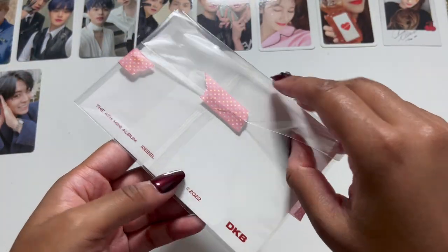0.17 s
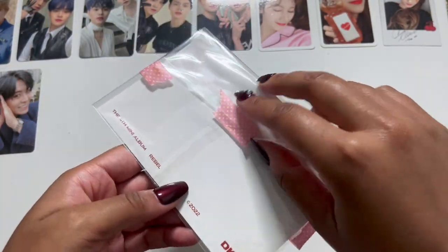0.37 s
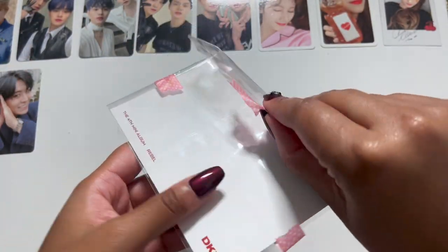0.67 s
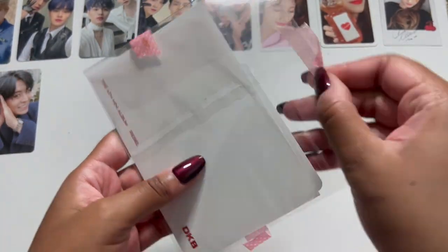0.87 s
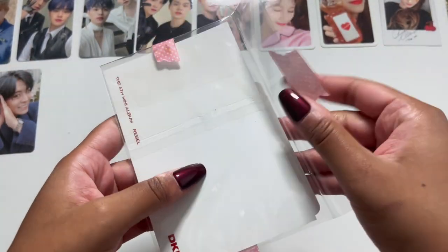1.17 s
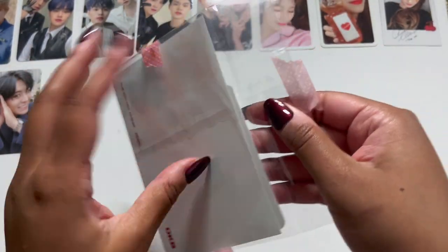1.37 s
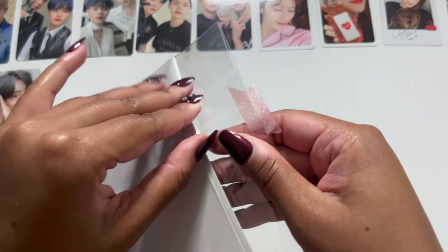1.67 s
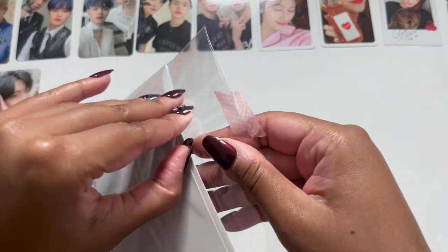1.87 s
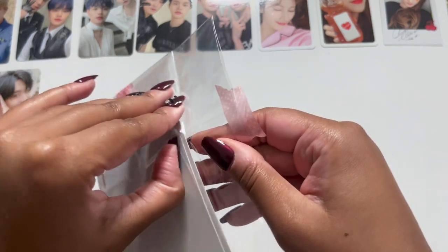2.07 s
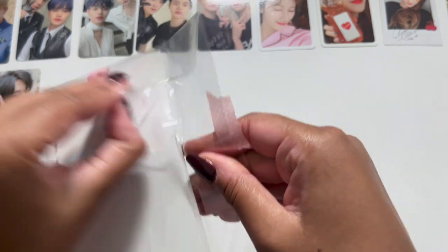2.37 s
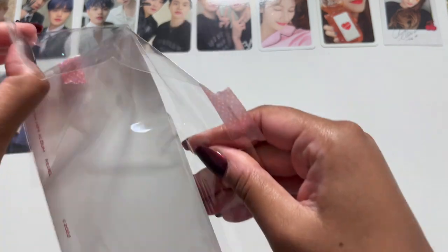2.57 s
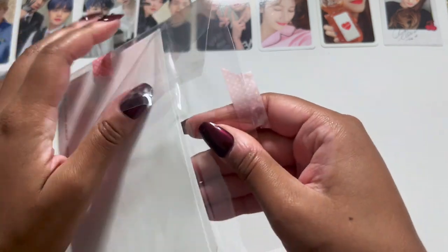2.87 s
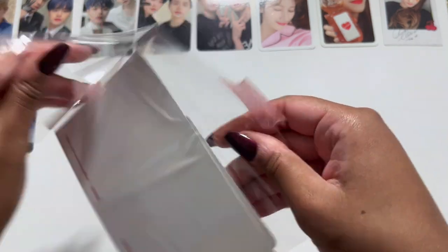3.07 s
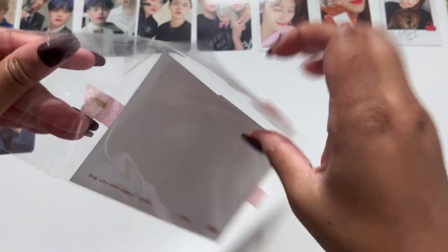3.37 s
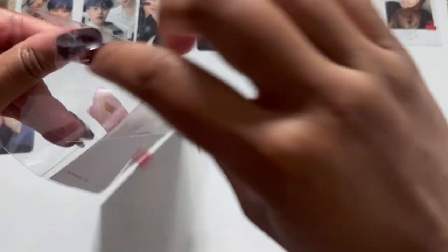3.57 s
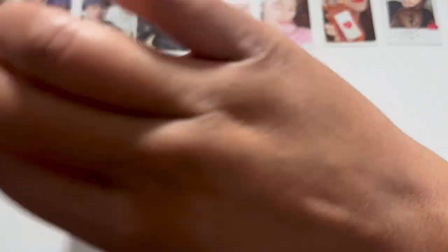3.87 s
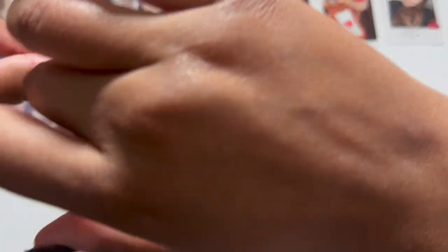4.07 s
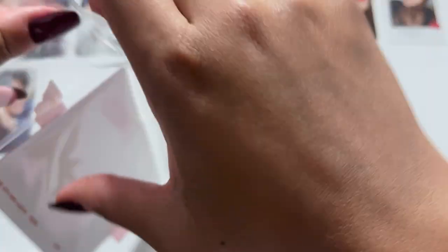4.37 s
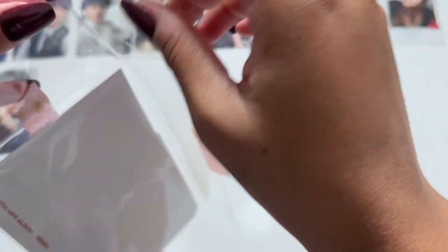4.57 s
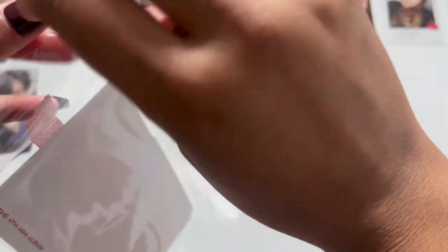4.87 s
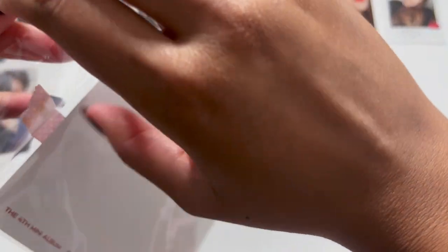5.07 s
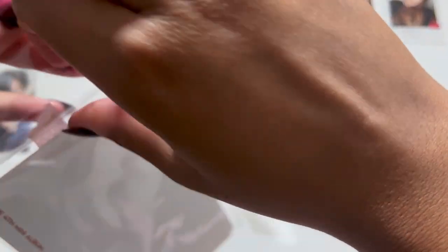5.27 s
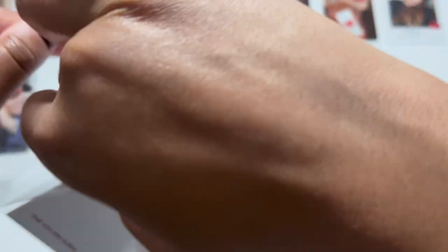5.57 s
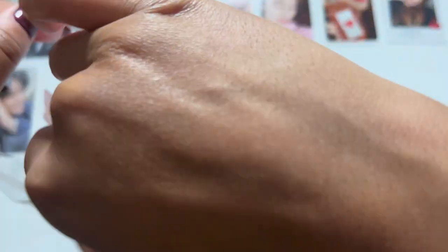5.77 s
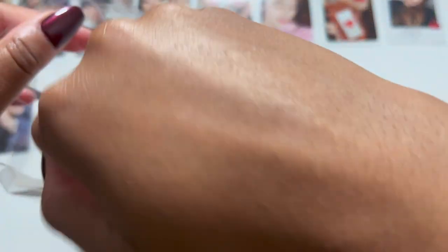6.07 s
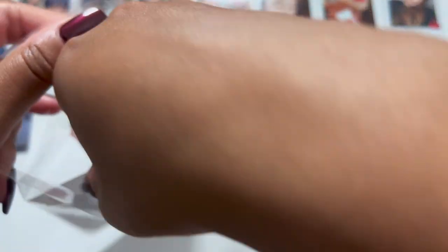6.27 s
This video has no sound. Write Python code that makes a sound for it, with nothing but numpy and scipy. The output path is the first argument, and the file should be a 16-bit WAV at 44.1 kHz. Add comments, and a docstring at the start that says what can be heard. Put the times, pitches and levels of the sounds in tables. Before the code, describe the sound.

Crisp film buckles irregularly, bright and dry with short hollow pops, nearer the left side. It begins quietly, grows steadily, peaks in a sharp crackling burst, continues in separate snaps with brief lulls, and thickens again near the end. Soft knocks on the table top and deep short bumps travel through the microphone stand. Close stereo pickup in a small room with short reflections and very faint hiss.

```python
"""Bright ticks, bursts of film noise and hollow pops over fine crackle: two hands open a thin plastic sleeve
over a table, close under a small stereo recorder on a stand. Each buckling crease is a tick plus short noises
with decaying sine rings. Wrists give low decaying sines, knocks a sum of table modes; shaped noise makes
the stand's tremble and the hiss. A small room answers the film through decaying noise tails."""
import sys
import numpy as np
from scipy import signal
from scipy.fft import rfft, irfft, next_fast_len
from scipy.io import wavfile

SR = 44100
rng = np.random.default_rng(int(sys.argv[2]) if len(sys.argv) > 2 else 0)


def generate_wav(signal):
    """Clip the signal to [-1, 1] and save it as 16-bit WAV at the path in sys.argv[1]."""
    frames = np.transpose(np.atleast_2d(signal))
    scaled = np.clip(frames, -1, 1) * 32767
    pcm = np.round(scaled).astype(np.int16)
    wavfile.write(sys.argv[1], SR, pcm)


N = 283122


def amp(db):
    """Amplitude factor of a level in dB."""
    return 10 ** (np.asarray(db) / 20)


def unit(x):
    """x scaled to RMS 1 over all its channels."""
    return x / np.sqrt(np.mean(x ** 2) + 1e-20)


def along(points, hz):
    """(Hz, value) points interpolated on a log frequency axis."""
    f, v = np.transpose(points)
    return np.interp(np.log(hz + 1), np.log(f + 1), v)


def curves(rows, at_s):
    """Each column after the time, read at the given seconds."""
    time_s, *columns = np.transpose(rows)
    return [np.interp(at_s, time_s, column) for column in columns]


def filtered(x, response):
    """x times a zero-phase response of frequency."""
    m = next_fast_len(N + SR // 2)
    spectrum = rfft(x, m) * response(np.fft.rfftfreq(m, 1 / SR))
    return irfft(spectrum, m)[..., :N]


def snaps():
    """Single creases that stand out as they buckle."""
    # Each row: start in seconds, burst energy in dB, burst pitch in Hz, pop energy in dB, pop pitch in Hz,
    # tick energy in dB; energies before colouring.
    snap_rows = [(0.1867, -39, 6220, -41, 300, -39), (0.2187, -29, 4400, -39, 300, -40),
                 (0.2364, -18, 4130, -25.5, 1670, -27), (0.2966, -35, 1710, -48, 1590, -22),
                 (0.307, -17, 5140, -41, 830, -17), (0.3462, -20, 5090, -33, 870, -33),
                 (0.471, -21, 5100, -31, 830, -6), (0.4773, -23, 7100, -41, 930, -6),
                 (0.4804, -20, 4200, -25, 835, 1.5), (0.4942, -19, 5370, -23.5, 930, -29),
                 (0.5015, -15, 4400, -28, 900, -12), (0.547, -24, 5500, -43, 596, -21),
                 (0.6034, -39, 5020, -50, 1000, -31), (0.663, -32, 2130, -32, 390, -58),
                 (0.6796, -4, 4750, -7.5, 1556, -1.5), (0.7232, -9.5, 3370, -16, 590, -13),
                 (0.851, -24, 3180, -26, 680, -17), (0.8571, -27, 2440, -30, 300, -31),
                 (0.9267, -31, 2470, -23, 850, -50), (1.072, -30, 3270, -29, 875, -50),
                 (1.092, -41, 1920, -20, 480, -34), (1.1278, -29, 4760, -19, 440, -28),
                 (1.1895, -24.5, 6430, -23.5, 546, -19.5), (1.218, -23, 4700, -24.5, 387, -39),
                 (1.226, -27, 2060, -19, 674, -42), (1.2834, -30, 1990, -30, 840, -29),
                 (1.297, -15, 2210, -16.5, 867, -8.5), (1.359, -29, 1960, -39, 810, -30),
                 (1.472, -27, 3300, -24, 900, -28), (1.494, -14, 3250, -22.5, 1170, -38),
                 (1.5178, -16, 4270, -19.5, 820, -16), (1.533, -9.5, 5940, -16.5, 508, -11.5),
                 (1.5764, -19, 4100, -23.5, 810, -6), (1.6118, -30, 5610, -26, 800, -47),
                 (1.6885, -6.5, 4160, -13, 910, 1), (1.7055, -8, 2040, -17.5, 960, -29),
                 (1.7529, -14.5, 3260, -18.5, 885, -17), (1.7924, -9, 4120, -27, 780, -11),
                 (1.823, -19, 3480, -26, 1170, -18), (1.912, -14, 4050, -30, 1600, -13.5),
                 (1.9314, -19, 4040, -30.5, 910, -15), (1.9598, -14.5, 4230, -23, 880, -4),
                 (2.1735, -18.5, 4090, -25.5, 800, -36), (2.1882, -20.5, 3880, -24.5, 690, -13.5),
                 (2.1942, -24, 5000, -26, 1000, -30), (2.217, -10, 2260, -11, 684, -6),
                 (2.2277, -19, 5460, -25, 870, -2.5), (2.239, -11, 4050, -27, 530, -14),
                 (2.2553, -12, 4750, -23, 770, -18), (2.269, -8.5, 4200, -24, 1030, -17),
                 (2.2735, -6.5, 5480, -18.5, 1660, -9), (2.2795, -11, 5200, -34, 1460, -7.5),
                 (2.3297, -2.5, 3750, -7, 900, 5), (2.3486, -3, 4810, -17, 900, -7),
                 (2.363, 2.5, 3980, -6, 1530, 3), (2.3764, 2.5, 3740, -10, 1490, -4),
                 (2.382, 5.5, 4150, -23, 690, 0), (2.397, 3, 3250, -31, 1060, -3),
                 (2.4027, -10, 3200, -13, 800, -21), (2.4128, -5, 3180, -14, 1000, -15),
                 (2.4667, 4.5, 5760, -5.5, 1500, -24), (2.5798, -13, 5940, -36, 1450, -11.5),
                 (2.605, -6, 5800, -15.5, 665, -6.5), (2.648, -25, 4730, -21, 464, -31),
                 (2.6894, -4, 3630, -4.5, 900, -22), (2.7114, -2, 3980, -11.5, 790, 2),
                 (2.7203, -16, 1700, -8.5, 730, -32), (2.7382, -10.5, 4500, -11, 970, -31),
                 (2.756, -11, 3970, -14, 900, -9), (2.7767, -11, 5650, -14, 810, -1.5),
                 (2.8065, -20, 4040, -29, 1130, -29), (2.8146, -21, 4000, -18, 310, -37),
                 (2.9284, -24.5, 3900, -36, 302, -23), (2.953, -7.5, 5090, -21.5, 900, -6),
                 (2.9929, -4, 1700, -7.5, 720, -5), (3.012, -23, 3650, -14, 780, -30),
                 (3.02, -15, 3210, -14, 900, -35), (3.04, -1.5, 6800, -17, 835, 0.5),
                 (3.046, 2.5, 3320, -5.5, 1070, -11), (3.063, 0, 3360, -8.5, 900, -6),
                 (3.0733, -18, 1960, -12, 293, -26), (3.097, -5, 3300, -17, 810, -7),
                 (3.1114, 3, 4740, -3, 984, 3), (3.1515, -22, 1620, -15, 1090, -16),
                 (3.1588, -6.5, 3250, -10.5, 900, -12), (3.1831, -11.5, 3980, -29, 1000, -13),
                 (3.1917, -10.5, 4230, -20, 980, -13), (3.2444, -18, 3320, -13.5, 790, -16),
                 (3.27, -11, 4170, -15, 1110, -14), (3.2844, -13.5, 3160, -26, 1040, -24),
                 (3.298, -18.5, 2500, -12, 830, -20), (3.3486, -14.5, 4550, -16.5, 845, -23),
                 (3.3961, -16.5, 3320, -19.5, 790, -31), (3.489, -30, 4500, -30, 496, -27),
                 (3.5156, -3.5, 5350, -18.5, 900, -4), (3.5576, -11, 4290, -22.5, 303, -15),
                 (3.6878, -22, 3900, -51, 300, -27), (3.7076, -3.5, 5300, -8.5, 400, -5),
                 (3.8122, -14.5, 2580, -19, 940, -38), (3.8292, -12, 4000, -20.5, 850, -28),
                 (3.9541, -7, 3180, -12.5, 815, -13), (4.0019, -29, 3450, -22, 810, -45),
                 (4.0477, -14, 3520, -23, 880, -31), (4.0882, -22, 4500, -52, 1280, -39),
                 (4.0968, -21, 4820, -13.5, 510, -27), (4.1486, 2, 3000, -3.5, 920, 0),
                 (4.2144, -7.5, 4780, -37, 845, -28), (4.2383, -19, 4500, -23, 795, -40),
                 (4.277, -12, 5400, -20, 806, -36), (4.408, -1, 3840, -8, 843, -1),
                 (4.5582, -28, 5200, -23, 375, -35), (4.5764, -18.5, 3880, -18, 860, -21),
                 (4.6437, -9, 3070, -17, 770, -9.5), (4.6523, -10, 5050, -17.5, 870, -16),
                 (4.679, -12, 4930, -16.5, 302, -24), (4.7163, -19.5, 3120, -25, 835, -35),
                 (4.7465, -15, 3200, -45, 890, -16), (4.773, -21, 4180, -28, 820, -24),
                 (4.793, -24, 2220, -36, 620, -38), (4.8367, -27, 2260, -27, 815, -31),
                 (4.8645, -22, 2320, -35, 730, -38), (4.8798, -3.5, 5370, -23, 860, -7),
                 (4.8917, -3, 3180, -8, 890, -0.5), (4.9281, -14, 4460, -35, 810, -16),
                 (5.0516, -44, 5260, -24.5, 490, -45), (5.126, -27, 4230, -24.5, 800, -41),
                 (5.1513, -10.5, 4260, -18, 304, -28), (5.1807, 1, 4560, -10.5, 774, 0.5),
                 (5.238, -17.5, 3070, -20, 300, -28), (5.2743, -31, 1630, -24, 825, -36),
                 (5.2858, -35, 3850, -17, 770, -46), (5.3166, -8, 7170, -22, 520, -16),
                 (5.378, -27, 3830, -22.5, 400, -20), (5.3912, -30, 1610, -19.5, 890, -37),
                 (5.4018, -17, 4460, -25, 516, -18), (5.421, -16, 2520, -12.5, 900, -11),
                 (5.4308, -21, 1610, -18, 1120, -23), (5.4417, 3, 4450, -8.5, 1480, -1),
                 (5.4674, -1.5, 4300, -12.5, 1350, -8), (5.501, -15, 5660, -25, 1290, -21),
                 (5.521, -12, 4520, -22, 755, -13), (5.525, -5.5, 5100, -12, 850, -10),
                 (5.563, -13, 2600, -19.5, 700, -10), (5.579, -17, 4070, -31, 1520, -37),
                 (5.6171, -4, 3200, -10.5, 826, -4), (5.643, -5.5, 3980, -12, 735, -22),
                 (5.683, -5, 3500, -6, 1510, -5), (5.6932, -2, 4570, -16, 1300, -15),
                 (5.7111, -5, 6280, -15, 980, -5), (5.7245, -2.5, 5260, -33, 300, -3),
                 (5.7342, -8, 2680, -11, 960, -0.5), (5.7451, -3, 5440, -13.5, 840, -22),
                 (5.7895, -18, 5400, -22, 920, -24), (5.8266, -26, 4870, -30, 840, -39),
                 (5.8736, -7.5, 3820, -9.5, 765, -7), (5.9214, -15.5, 4300, -36, 650, -6),
                 (5.9969, -26, 1830, -18, 835, -21), (6.0067, -4.5, 4750, -8, 370, -10),
                 (6.0518, -13.5, 4700, -18, 410, -23), (6.088, -15.5, 2600, -17, 910, -17),
                 (6.1433, -15, 5470, -12.5, 1480, -25), (6.1612, -6.5, 5270, -17.5, 1420, -12),
                 (6.2458, -17, 3100, -18.5, 830, -10), (6.2547, -15, 4350, -19, 300, -32.5),
                 (6.2698, -11.5, 7300, -16.5, 390, -16), (6.2957, -14, 5330, -20.5, 300, -7),
                 (6.3073, -8.5, 3220, -15, 300, -12), (6.3237, -14, 4150, -19, 300, -24),
                 (6.3487, -7, 5880, -19, 302, -9.5), (6.3802, -13, 1940, -14.5, 300, -17)]
    return creases(*np.transpose(snap_rows))


def rustles(count=28):
    """Dense runs of small creases too close to tell apart."""
    # The first run, at 0, stands for the fading room tail of an earlier snap.
    # Each row: start in seconds, length in seconds, burst level in dB, burst pitch in Hz, pop level in dB,
    # pop pitch in Hz, tick level in dB; levels and burst pitch before scatter.
    dense_runs = [(0, 0.037, -49.5, 5630, -67.5, 940, -66), (.33, 0.017, -52, 5250, -67, 844, -48),
                  (2.385, 0.023, -26.5, 3050, -41.5, 930, -30), (2.418, 0.02, -21.5, 4230, -29, 870, -17),
                  (2.444, .019, -35, 3850, -32, 450, -46), (3.055, .014, -28.5, 3280, -33.5, 980, -42),
                  (3.095, 0.058, -53, 3200, -47, 990, -56), (3.2, 0.12, -53, 3320, -45, 1070, -76),
                  (4.92, .012, -44, 4420, -39, 860, -44), (5.148, .008, -33, 4500, -37.5, 420, -43),
                  (5.417, .013, -36, 3140, -40, 890, -40), (5.455, 0.0091, -43, 4370, -34.5, 1330, -56),
                  (5.625, 0.028, -37, 4200, -38, 474, -34.5), (5.713, 0.011, -34, 5170, -35, 910, -39)]
    s, length_s, burst_db, burst_hz, pop_db, pop_hz, tick_db = np.repeat(dense_runs, count, axis=0).T
    place = rng.uniform(size=len(s))
    share_db = 10 * np.log10(length_s * SR / count) + rng.normal(-1.5, 3.5, len(s))
    burst_hz = burst_hz * np.exp(rng.normal(0, 0.15, len(s)))  # scattered from crease to crease
    return creases(s + place * length_s, burst_db + share_db, burst_hz,
                   pop_db + share_db, pop_hz, tick_db + share_db)


def crackle(count=6000):
    """Bending film: many tiny creases at random moments and pitches, some stronger than the rest."""
    # Each row: time in seconds, level of the fine crackle in dB, level of its pops in dB; before colouring.
    bend = [(0, -63, -83), (.13, -69.5, -75.5), (.32, -54.5, -66.5), (.43, -70.5, -72), (.56, -58, -67),
            (.66, -67, -68), (.72, -58, -61), (.9, -62.5, -67.5), (1.03, -68, -68.5), (1.3, -59.5, -59),
            (1.42, -75, -72), (1.56, -64, -62), (1.68, -65, -69), (1.84, -60, -63), (2.02, -65.5, -71),
            (2.2, -79, -67), (2.34, -40.5, -52), (2.4, -26, -45), (2.61, -52.5, -64), (2.77, -51, -74),
            (2.95, -62, -62), (3.16, -47.5, -56), (3.34, -61, -62), (3.54, -57, -59.5), (3.85, -61.5, -64),
            (4.1, -53.5, -52.5), (4.2, -47, -49.5), (4.38, -67, -67), (4.45, -57, -57), (4.8, -62, -62),
            (5.13, -64.5, -62.5), (5.33, -55, -60), (5.56, -57, -55), (5.66, -36.5, -47.5),
            (5.85, -52.5, -55.5), (6.2, -54, -55.5), (6.42, -42, -46.5)]
    gentle_db, tick_at_gentle_db, tick_growth = -55, -58, 0.85  # ticks grow more slowly than the crackle
    pop_median_hz, pop_scatter = 900, 0.18  # hollow of the sleeve; natural-log spread
    burst_median_hz, burst_scatter = 4200, 0.348

    s = rng.uniform(0, N / SR, count)
    spread_db = 2.2 * rng.exponential(size=count) + rng.normal(0, 2.5, (3, count))
    spread_db -= 10 * np.log10(np.mean(amp(spread_db) ** 2) * count / N)  # independent of count
    burst_db, pop_db = curves(bend, s)
    tick_db = tick_at_gentle_db + tick_growth * (burst_db - gentle_db)
    pop_hz = pop_median_hz * np.exp(rng.normal(0, pop_scatter, count))
    burst_hz = burst_median_hz * np.exp(rng.normal(0, burst_scatter, count))
    return creases(s, burst_db + spread_db[0], burst_hz,
                   pop_db + spread_db[1], pop_hz, tick_db + spread_db[2])


def creases(s, burst_db, burst_hz, pop_db, pop_hz, tick_db):
    """Buckling film: a sharp tick, slightly later at the left port; burst and pop last a few milliseconds."""
    # The hands drift left. Each row: time in seconds, lead of the left port in samples.
    left_lead = [(0, 4), (1.6, 4), (2.5, 10), (3.5, 13), (6.42, 12)]
    # The hollow rings most while the sleeve is held wide open.
    # Each row: time in seconds, ring over noise as an amplitude ratio.
    hollow = [(0, 0.6), (2.85, 0.49), (3.05, 1.13), (3.35, 1.2), (3.5, 0.52), (6.42, 0.45)]
    lead = curves(left_lead, s)[0]
    pop_ring = curves(hollow, s)[0][:, None]
    pop = bursts(s, pop_db, life_s=0.0034, alike=0.46, lead=lead, hz=pop_hz, ring=pop_ring)
    burst = bursts(s, burst_db, life_s=0.003, alike=0.24, lead=lead, hz=burst_hz, ring=0.84)
    tick = bursts(s, tick_db, life_s=0.0008, alike=0.95, lead=-4)
    return np.array([pop, burst, tick])


def bursts(s, db, life_s, alike, lead, hz=0, ring=0, size=384):
    """Short noises of set energy with an optional ring: left, right, and outward into the room, where
    the noise of all directions evens out to a plain click; alike is the shared power, lead in samples."""
    t = np.arange(size) / SR
    shared, *own = rng.standard_normal((len(s), 3, size)).transpose(1, 0, 2)
    tone = ring * np.sin(2 * np.pi * np.outer(hz, t))
    shape = np.exp(-(t / life_s) ** 1.4) * (1 - np.exp(-t / 0.0003)) ** 2
    left, right = ((np.sqrt(alike) * (shared + tone) + np.sqrt(1 - alike) * noise) * shape
                   for noise in own)
    click = np.linalg.norm(shape) * (t == 0)
    outward = np.sign(shared[:, :1]) * (click + tone * shape ** 4)

    out = []
    for wave, late in zip((left, right, outward), (-lead / 2, lead / 2, 0)):
        wave = wave * (amp(db) / np.linalg.norm(wave, axis=1))[:, None]
        start = np.round(np.abs(s * SR + late)).astype(int)
        at = start[:, None] + np.arange(size)
        out.append(np.bincount(at.ravel(), wave.ravel(), N + SR)[:N])
    return np.array(out)


def part(k):
    """The film's colour in its low, middle or high range, with mean power gain 1."""
    # Film as the microphones colour it. Each row: frequency in Hz, relative gain in dB.
    film_colour = [(150, -7.5), (300, -1), (600, -4.5), (930, -2.5), (1280, -2.5), (1900, -1), (2700, -1.5),
                   (3250, -0.5), (4700, 1.5), (6800, -1.5), (8300, -6.5), (10000, -0.5), (11900, -1.5),
                   (13800, -3), (16500, -27)]
    # Range edges in Hz: pop below, burst between, tick above.
    edges_hz = (2170, 8800)

    def shape(hz):
        low, high = (1 / (1 + (hz / edge) ** 8) for edge in edges_hz)
        share = [low, high - low * high, 1 - high][k]
        gain = amp(along(film_colour, hz)) * np.sqrt(share)
        return gain / np.sqrt(np.mean(gain ** 2))
    return shape


def near_ports(film):
    """Direct film sound: the hands are nearer the left port, so the level difference varies with frequency."""
    # Each row: frequency in Hz, left minus right in dB.
    left_over_right = [(110, 8), (200, 7), (380, 10), (700, 14), (1290, 8), (2380, 8), (4400, 11),
                       (8120, 3), (15000, -1)]
    return filtered(film, lambda hz: amp(np.outer([1, -1], along(left_over_right, hz)) / 2))


def room(x):
    """Table and hands scatter at once and briefly; walls come later, each frequency dying at its own speed."""
    # Each row: frequency in Hz, t60 in seconds of the noise before the early scatter is shaped.
    room_t60 = [(250, 0.26), (800, 0.36), (2000, 0.32), (5500, 0.27), (12000, 0.11)]
    wall_s = 0.021  # until the first wall answers
    out, step = np.zeros((2, N + 2 * SR)), SR // 16
    for a in range(0, N, step):  # a fresh random tail for each step
        hz, t, z = signal.stft(rng.standard_normal((2, SR // 2)), SR, nperseg=256)
        decay = amp(-60 * t / along(room_t60, hz)[:, None])
        tail = signal.istft(z * decay, SR, nperseg=256)[1]
        t = np.arange(tail.shape[1]) / SR
        walls = np.where(t > wall_s, 1 + 0.22 * np.exp(-np.abs(t - wall_s) / 0.0053), 0.45)
        scatter = 0.55 * np.exp(-t / 0.021)
        tail = tail * (walls + scatter)
        wet = signal.fftconvolve(x[None, a:a + step], tail / np.linalg.norm(tail[0]), axes=1)
        out[:, a:a + wet.shape[1]] += wet
    return out[:, :N]


def knocks():
    """Cards and knuckles knock the table top: decaying sines at its modes."""
    # Each row: start in seconds, nominal level in dB, hardness (tilt over the modes) in dB per octave.
    knock_rows = [(0.631, -53.5, -17), (2.36, -29.5, -1), (2.443, -38, 17.5), (2.758, -36, -1),
                  (3.054, -29, -8), (3.244, -40, 8), (3.703, -42, 9), (4.154, -33.5, -1), (4.727, -47, -4),
                  (4.892, -28.5, 2), (5.183, -27, 3.5), (5.419, -31.5, -2), (5.471, -30.5, 1.5),
                  (5.645, -25.5, -7), (5.688, -25, 4), (5.966, -36, 8), (6.012, -27.5, 2.5),
                  (6.084, -32, 4), (6.147, -31, 4), (6.259, -35, -1)]
    # Modes of the table. Each row: frequency in Hz, relative level in dB, t60 in seconds.
    table_modes = [(108, 0, 0.095), (145, 1, 0.075), (258, 1, 0.057), (314, -0.5, 0.048)]
    tilt_pivot_hz = 170
    x, t = np.zeros(N + SR), np.arange(SR // 2) / SR
    for s, db, hardness_db in knock_rows:
        ring = 0
        for hz, level_db, t60_s in table_modes:
            mode_db = level_db + hardness_db * np.log2(hz / tilt_pivot_hz) - 60 * t / t60_s
            ring = ring + amp(mode_db) * np.sin(2 * np.pi * hz * t)
        x[round(s * SR):][:len(t)] += amp(db) * (1 - np.exp(-t / 0.0062)) * ring
    return x[:N]


def bumps():
    """Wrists on the table swing the stand: each bump a low sine that stops suddenly."""
    # Each row: start in seconds, nominal level in dB, pitch in Hz, length in seconds.
    bump_rows = [(0.93, -19.5, 59, 0.053), (2.901, -38, 56, 0.064), (2.96, -23, 59.4, 0.029),
                 (2.989, -29, 62, .043), (3.549, -33.5, 62, 0.12), (5.098, -16, 67, 0.023),
                 (5.126, -21.5, 66.8, 0.043), (5.228, -35, 61.6, .042), (5.863, -40, 65.3, 0.11),
                 (6.287, -19, 66.4, 0.025), (6.317, -20.5, 66, 0.041)]
    stop_power = 2.4  # how suddenly a swing stops
    x, t = np.zeros(N + SR), np.arange(SR // 2) / SR
    for s, db, hz, length_s in bump_rows:
        swing = (1 - np.exp(-t / 0.0045)) * np.exp(-(t / length_s) ** stop_power)
        x[round(s * SR):][:len(t)] += amp(db) * swing * np.sin(2 * np.pi * hz * t)
    return x[:N]


def tremble():
    """Small hand movements keep the stand trembling: low noise, mostly shared by the ports at low pitch."""
    # Each row: time in seconds, nominal level in dB.
    shake = [(0.0, -54.5), (0.32, -55.5), (0.86, -52.5), (1.09, -48.5), (1.57, -56), (2.13, -55),
             (2.29, -54), (2.7, -54), (2.95, -49.5), (3.47, -50.5), (4.49, -51), (5.09, -47.5), (5.74, -49),
             (6.42, -41)]
    # Each row: frequency in Hz, relative response of the stand in dB.
    stand_response = [(12, -65), (20, -46), (27, -29), (40, -17), (54, 6), (70, 10), (91, -1), (130, 0),
                      (216, -11.5), (300, -15.5), (390, -45), (660, -120)]
    noise = rng.standard_normal((2, N))
    mid, side = unit(filtered(noise, lambda hz: amp(along(stand_response, hz))))
    side = filtered(side, lambda hz: hz / (hz + 400))
    level = amp(curves(shake, np.arange(N) / SR)[0])
    return level * np.array([mid + side, mid - side])


def stand():
    """Bumps, knocks and tremble reach the ports through the stand, slightly stronger at the left."""
    return (bumps() + knocks() + tremble()) * amp([[0.7], [-0.7]])


def air():
    """Faint steady room hiss: shaped noise, unrelated at the two ports."""
    # Each row: frequency in Hz, relative gain in dB.
    hiss_colour = [(200, -6), (860, -5), (2500, -9), (5000, -8), (8200, -15), (12000, -10), (15000, -27)]
    level_db = -69
    noise = rng.standard_normal((2, N))
    return amp(level_db) * unit(filtered(noise, lambda hz: amp(along(hiss_colour, hz))))


def scene():
    """Film heard directly and through the room, over the stand and the air."""
    layers = snaps() + rustles() + crackle()  # pop, burst, tick
    *film, outward = sum(filtered(layer, part(k)) for k, layer in enumerate(layers))
    wet = amp([[-3.5], [-5]]) * room(outward)
    return near_ports(film) + wet + stand() + air()


def record(dry):
    """The loudest peaks are gently rounded off; the recorder keeps nothing above its band limit."""
    ceiling, top_hz = 0.95, 16800
    rounded = dry / (1 + np.abs(dry / ceiling) ** 4) ** (1 / 4)
    return filtered(rounded, lambda hz: hz < top_hz)


dry = scene()
out = record(dry)
generate_wav(out)
```